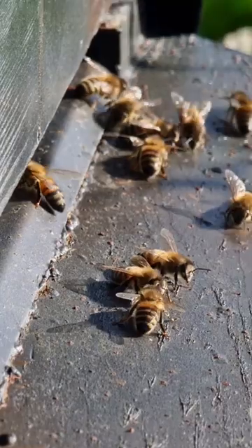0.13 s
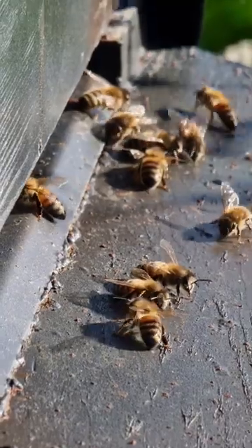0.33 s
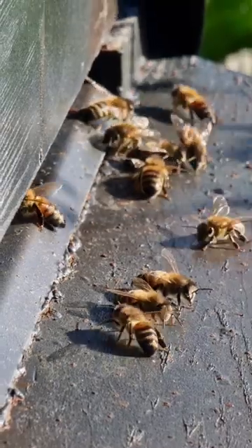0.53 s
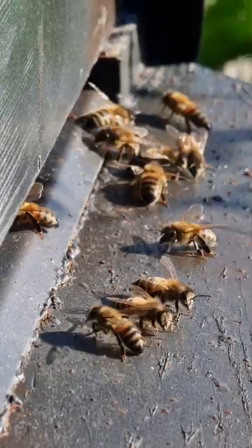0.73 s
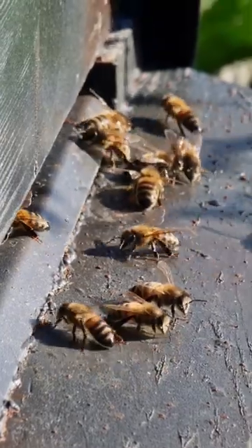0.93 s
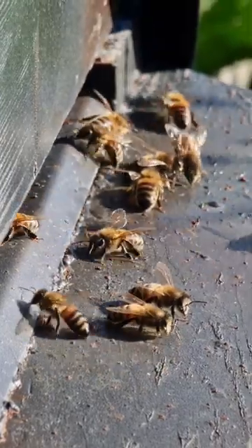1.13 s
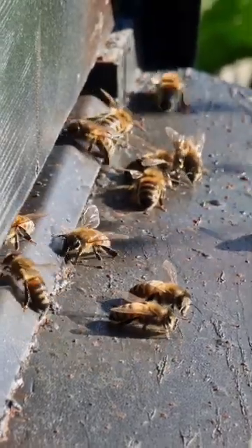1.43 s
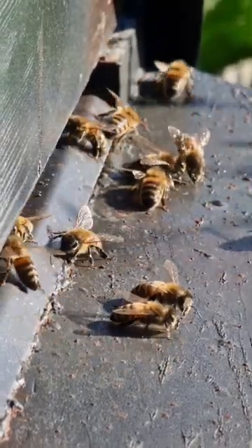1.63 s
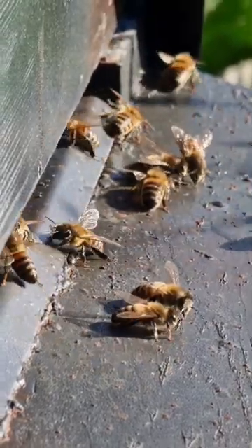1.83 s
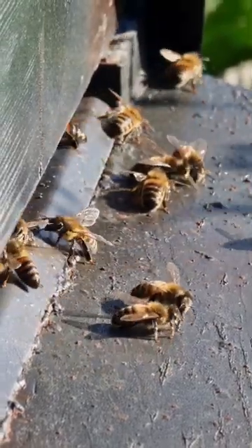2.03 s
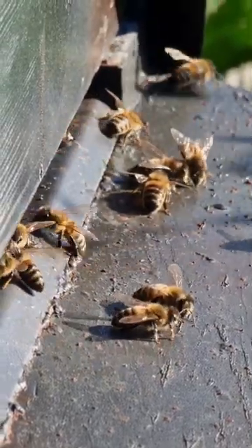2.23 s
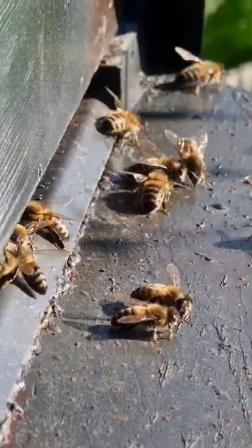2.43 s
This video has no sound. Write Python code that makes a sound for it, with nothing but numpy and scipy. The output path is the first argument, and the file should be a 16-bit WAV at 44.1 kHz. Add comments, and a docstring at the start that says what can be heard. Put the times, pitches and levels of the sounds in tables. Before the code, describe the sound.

Many bees hum in a low, wavering blend on a hive landing board outdoors, while wind rumbles and thumps on a close stereo microphone; distant road rush, soft leaf hiss and faint bird chirps lie behind.

```python
"""Bees fanning at a hive in light wind

Bees fan on the landing board of a hive outdoors: detuned harmonic sums blur into a hum of many wings.
Wind buffets two microphone ports as low noise and short low swings that rise and fade; a distant road,
as coloured noise, rumbles and rushes from the left, uneven in level but rising overall. Leaves are a
steady patchy hiss, and a far bird is a few thin gliding sines blurred by noise. The sound begins
abruptly after a short silence."""
import sys
import numpy as np
from scipy import signal
from scipy.fft import rfft, irfft
from scipy.io import wavfile
from scipy.ndimage import uniform_filter1d

SR = 44100
rng = np.random.default_rng(int(sys.argv[2]) if len(sys.argv) > 2 else 0)


def digitize_waveform(pressure):
    """Quantize a signal to 16-bit integers and store it at the path in sys.argv[1].

    Rows of a 2-D input are taken as channels; values are limited to [-1, 1].
    """
    field = np.atleast_2d(pressure).T
    bounded = np.clip(field, -1, 1)
    quanta = np.round(bounded * 32767).astype(np.int16)
    wavfile.write(sys.argv[1], SR, quanta)


N = 114219


def amp(db):
    """Decibel law: a level as an amplitude ratio."""
    return 10 ** (np.asarray(db) / 20)


def rms_one(x):
    """Normalisation of power: scale to an rms of 1."""
    return x / np.sqrt(np.mean(x ** 2) + 1e-20)


def in_time(rows):
    """Linear interpolation: the columns of a time table at every sample."""
    s, *columns = np.transpose(rows)
    return [np.interp(np.arange(N) / SR, s, column) for column in columns]


def grid_hz():
    """Discrete Fourier frequencies, kept at 1 Hz or more for the logarithm."""
    return np.maximum(np.arange(N // 2 + 1) * SR / N, 1)


def at_hz(points):
    """Log-frequency interpolation: a spectrum table on the Fourier grid."""
    hz, value = np.transpose(points)
    return np.interp(np.log(grid_hz()), np.log(hz), value)


def drift(rate_hz):
    """Low-passed random process: noise through two equal poles, as a slow wander of rms 1."""
    step = 40  # samples between computed values
    pole = np.exp(-2 * np.pi * rate_hz * step / SR)
    raw = rng.standard_normal(N // step + 2002)
    slow = signal.lfilter([1], [1, -2 * pole, pole ** 2], raw)[2000:]  # drop the settling
    return np.interp(np.arange(N) / step, np.arange(len(slow)), rms_one(slow))


def evened(x, window, floor, evenness):
    """Amplitude compression: divide by a power of the local mean square over a window of samples."""
    return x / (uniform_filter1d(x ** 2, size=window) + floor) ** (evenness / 2)


def band_noise(low_hz, high_hz, shape):
    """Band-limited white noise of rms 1."""
    band = signal.butter(3, [low_hz, high_hz], "band", fs=SR, output="sos")
    return rms_one(signal.sosfilt(band, rng.standard_normal(shape)))


def noise(colour, alike, patchy_db, rate_hz):
    """Partial coherence: noise partly shared by the ports, its octave bands flickering; rms 1."""
    shared, left, right = rfft(rng.standard_normal((3, N)))
    pair = np.sqrt(alike) * shared + np.sqrt(1 - alike) * np.array([left, right])
    pair = pair * amp(at_hz(colour))
    octave = np.log2(grid_hz())
    together = drift(rate_hz / 4)
    out = 0
    for centre in np.arange(4, 15):
        window = np.clip(1 - np.abs(octave - centre), 0, 1)
        flicker_db = patchy_db * (.5 * together + drift(rate_hz))
        out = out + irfft(pair * window, N) * amp(flicker_db)
    return rms_one(out)


def filtered(x, response):
    """Circular convolution; the mirrored end replaces the start, later silenced, to ease the wrap."""
    padded = np.concatenate([x[:, :-2001:-1], x[:, 2000:]], axis=1)
    return irfft(rfft(padded) * response, N)


# uneven level of the road, rising overall:
# start_s [s], level_db [dB, in an 800 Hz band about 1 kHz, before the trim]
ROAD_LEVEL = [(0.13, -51), (1.18, -48.5), (1.25, -54), (1.27, -45.5), (1.33, -50), (1.42, -46.5),
              (1.44, -47.5), (2.51, -45.5), (2.59, -44.5)]
# engine rumble and tyre rush: frequency_hz [Hz], density_db [relative dB per Hz]
ROAD_SPECTRUM = [(40, 7), (80, 18.5), (130, 14), (200, 7.5), (280, -3.5), (420, -7), (600, -4.5), (800, 1),
                 (1100, 1), (1400, -3.5), (1700, -11.5), (2500, -23), (4000, -50.5)]
# share of road power common to both ports: frequency_hz [Hz], shared [0-1]
ROAD_COHERENCE = [(60, 1), (150, 0.68), (260, 1), (340, 0.98), (420, 0.26), (520, 0.94), (700, 0.84),
                  (820, 0.8), (1050, 0.66), (1250, 0.63), (1600, 1), (1900, 0), (2500, 0.3)]
ROAD_TRIM_DB, ROAD_PATCHY_DB, ROAD_FLICKER_HZ = 3, 1.43, 7.1


def road():
    """Broadband radiation of far traffic: partly coherent coloured noise under an uneven level."""
    level_db, = in_time(ROAD_LEVEL)
    density_1khz = rms_one(amp(at_hz(ROAD_SPECTRUM)))[int(1000 * N / SR)]
    band_rms = density_1khz * np.sqrt(2 * 800 / SR)
    rush = noise(ROAD_SPECTRUM, at_hz(ROAD_COHERENCE), ROAD_PATCHY_DB, ROAD_FLICKER_HZ)
    return amp(level_db + ROAD_TRIM_DB) / band_rms * rush


# groups of fanning bees: nominal_beat_hz [Hz], spread [share of beat per detuning step],
# base_level_db [dB], left_minus_right_db [dB]
BEE_GROUPS = [(266.6, .015, -53.5, 1.5), (235.3, .012, -54, -3.5), (216.1, .025, -54.5, 1),
              (87.36, .02, -42, 2)]
# strength of the wing-beat harmonics, one row per group, columns harmonics 1 to 7 [relative dB]
WING_HARMONICS = [
    [-7.5, -5, 1.5, -3, -2, -8.5, -16.5],
    [-2, -11, -1.5, 2.5, 2, -6, -10.5],
    [-4.5, -13.5, -10, -3.5, 0.5, -2, -7],
    [0.5, -25.5, -27, -31, -35.5, -29, -40],
]
# drift of the last, slowest group: start_s [s], beat [share of nominal], level_change_db [dB]
SLOW_GROUP_DRIFT = [(.13, 1.0, 1), (.3, 1.03, 5.5), (.45, 1.0, 3.5), (.6, .9, 0.5), (.85, .9, 2),
                    (1.0, 1.03, 1.5), (1.15, .97, -0.5), (1.3, .98, 0.5), (1.45, .98, -2), (1.6, .95, -6.5),
                    (1.75, .98, 9), (1.9, 1.0, -6.5), (2.1, .95, -4.5), (2.3, .95, -3.5), (2.59, .92, -14)]
WING_WANDER, WING_WANDER_HZ = .01407, 5.826  # rms share of the beat rate; pace of the wander
BEE_FLUTTER_DB, BEE_FLUTTER_HZ = 6, 5.9
GROUP_EVENNESS = .7  # how far a group keeps to its level


def bees(count=5):
    """Superposition of detuned harmonic series: each bee wanders in beat rate and flutters in level."""
    steady = (0.99, 0)  # beat share, level change in dB
    moves = [steady] * (len(BEE_GROUPS) - 1) + [in_time(SLOW_GROUP_DRIFT)]
    out = 0
    for group, harmonics_db, (pace, change_db) in zip(BEE_GROUPS, WING_HARMONICS, moves):
        beat_hz, spread, level_db, pan_db = group
        hum = 0
        for detune in np.linspace(-1.5, 1.5, count):
            wander = WING_WANDER * drift(WING_WANDER_HZ)
            wing_hz = beat_hz * pace * (1 + spread * detune + wander)
            phase = 2 * np.pi * (np.cumsum(wing_hz) / SR + rng.random())
            wave = sum(amp(db) * np.sin((k + 1) * phase) for k, db in enumerate(harmonics_db))
            flutter = amp(BEE_FLUTTER_DB * drift(BEE_FLUTTER_HZ))
            hum = hum + wave * np.exp(-detune ** 2 / 2) * flutter
        hum = rms_one(evened(rms_one(hum), 5000, .1, GROUP_EVENNESS))
        out = out + hum * amp(level_db + change_db + np.array([[pan_db], [-pan_db]]) / 2)
    return out


# hiss of leaves: frequency_hz [Hz], density_db [relative dB per Hz]
LEAF_SPECTRUM = [(700, -38.5), (1500, 1), (2200, 0.5), (3200, -1), (4200, -5.5), (5200, -9), (6300, -18),
                 (7300, -30.5), (8300, -66)]
LEAVES_DB, LEAVES_LIKENESS = -55, .24  # rms level; share of power common to both ports
LEAVES_PATCHY_DB, LEAVES_FLICKER_HZ = .5, 6.7


def leaves():
    """Incoherent summation of many small sources: a nearly steady coloured hiss."""
    return amp(LEAVES_DB) * noise(LEAF_SPECTRUM, LEAVES_LIKENESS, LEAVES_PATCHY_DB, LEAVES_FLICKER_HZ)


# wind on the ports: start_s [s], level_db [dB], left_minus_right_db [dB]
WIND_GUSTS = [(.13, -36, -6.5), (.2, -37.5, -17), (.33, -39.5, -7.5), (.42, -44.5, 2), (.5, -35, -7),
              (.6, -40.5, -2.5), (.75, -35.5, -7), (.88, -37.5, -5.5), (1.0, -38.5, -0.5),
              (1.12, -35.5, -6), (1.21, -39, -6.5), (1.27, -40, -12.5), (1.4, -36.5, -9), (1.47, -44, -7.5),
              (1.56, -33, 3), (1.65, -39.5, -11), (1.8, -38, -10.5), (1.92, -38, -7.5), (2.05, -37.5, -6.5),
              (2.17, -34, 13), (2.25, -28, 0), (2.32, -35, -1.5), (2.4, -34.5, 3.5), (2.48, -39, 15),
              (2.54, -33, -10.5), (2.59, -31, -13)]
# turbulence: frequency_hz [Hz], density_db [relative dB per Hz]
WIND_SPECTRUM = [(15, -26), (22, -16), (32, -12), (42, -11), (52, 2.5), (65, 3), (80, 1), (100, -5.5),
                 (125, -15), (200, -21), (400, -44), (1000, -92)]
# bright edge: centre, level at the mean gust, dB per dB of gust
GUST_EDGE_HZ, GUST_EDGE_DB, GUST_EDGE_GROWTH = 135, -30, 1.6
LUMPY_DB, LUMPS_HZ, WIND_LIKENESS, WIND_PATCHY_DB = 2.8, 15, .34, .83
EVENNESS = .6  # how far the turbulence keeps to the gust level


def wind():
    """Turbulent pressure fluctuation: mostly separate at each port; stronger gusts are brighter."""
    level_db, pan_db = in_time(WIND_GUSTS)
    lumps_db = LUMPY_DB * np.array([drift(LUMPS_HZ), drift(LUMPS_HZ)])
    port_db = level_db + np.array([pan_db, -pan_db]) / 2 + lumps_db
    swirl = noise(WIND_SPECTRUM, WIND_LIKENESS, WIND_PATCHY_DB, LUMPS_HZ)
    swirl = rms_one(evened(swirl, 1000, .082, EVENNESS))
    mean_db = level_db.mean()
    edge_db = GUST_EDGE_DB + mean_db + GUST_EDGE_GROWTH * (port_db - mean_db)
    edge = band_noise(GUST_EDGE_HZ / 2, GUST_EDGE_HZ * 2, (2, N))
    return amp(port_db) * swirl + amp(edge_db) * edge


# bird chirps: start_s [s], length_s [s], start_pitch_hz [Hz], end_pitch_hz [Hz],
# level_db [dB, peak before rasp, blur and pan]
BIRD_CHIRPS = [(.208, .036, 4800, 5400, -62), (.435, .03, 3250, 3500, -63), (.575, .035, 5250, 5050, -65),
               (.615, .025, 3900, 3700, -60), (.636, .018, 3520, 3450, -60), (.987, .015, 4450, 5000, -65),
               (1.106, .025, 3500, 3850, -59), (1.350, .014, 4650, 5000, -63),
               (1.655, .025, 5300, 5150, -68)]
BIRD_PAN_DB = 5  # left minus right
BIRD_BLUR_S, BIRD_BLUR_DB = .03, -3  # leaves scatter the chirps
BIRD_RASP_DB, BIRD_RASP_HZ = 2, 60  # fast random waver


def bird():
    """Linear frequency modulation: short gliding whistles, then scattered by a decaying noise tail."""
    out, t = np.zeros(N), np.arange(N) / SR
    for start_s, length_s, start_hz, end_hz, level_db in BIRD_CHIRPS:
        u = np.clip((t - start_s) / length_s, 0, 1)  # progress through the chirp
        cycles = length_s * (start_hz * u + (end_hz - start_hz) * u ** 2 / 2)
        out += amp(level_db) * np.sin(np.pi * u) * np.sin(2 * np.pi * cycles)
    out = out * amp(BIRD_RASP_DB * drift(BIRD_RASP_HZ))
    tail_length = int(BIRD_BLUR_S * SR)
    tail = rng.standard_normal(tail_length) * amp(np.linspace(0, -20, tail_length))
    tail = tail / np.sqrt(np.sum(tail ** 2))
    out = out + amp(BIRD_BLUR_DB) * signal.fftconvolve(out, tail)[:N]
    return out * amp(np.array([[BIRD_PAN_DB], [-BIRD_PAN_DB]]) / 2)


# hard buffets: centre_s [s], swing_level_db [dB], swing_hz [Hz], port [0 left, 1 right]
PORT_BUFFETS = [(.247, -20, 75, 1), (.303, -21, 64, 1), (.406, -24.5, 69.8, 0), (0.447, -21, 54.8, 1),
                (.515, -27.5, 75, 1), (0.542, -15, 63.8, 0), (0.936, -22, 61.3, 1), (1.094, -26.5, 66.3, 1),
                (1.322, -19.5, 85, 1), (1.41, -24, 69, 1), (1.505, -24, 96.6, 1), (1.542, -21, 54.8, 1),
                (1.685, -25, 88, 1), (1.951, -25.5, 94, 1), (1.998, -19, 73, 1), (2.212, -11, 66, 0),
                (2.261, -18.5, 74.7, 0), (2.297, -20.5, 93, 0), (2.528, -26.5, 85.5, 1),
                (2.568, -19.5, 54.5, 1)]
BUFFET_SWINGS = .9  # half-width of the Gaussian envelope in cycles
SNAP_HZ, SNAP_DB, SNAP_S = 240, -8, .008  # pitch region; level against a 0 dB swing; lead and half-width


def buffets():
    """Transient membrane displacement: one is sucked out for a swing or two; hard ones snap first."""
    out, t = np.zeros((2, N)), np.arange(N) / SR
    snap = band_noise(SNAP_HZ / 2, SNAP_HZ * 1.37, N)
    for centre_s, level_db, swing_hz, port in PORT_BUFFETS:
        cycles = (t - centre_s) * swing_hz
        swing = -np.exp(-(cycles / BUFFET_SWINGS) ** 2) * np.cos(2 * np.pi * cycles)
        snap_envelope = np.exp(-((t - centre_s + SNAP_S) / SNAP_S) ** 2)
        onset = amp(SNAP_DB + level_db) * snap * snap_envelope  # grows faster than the swing
        out[int(port)] += amp(level_db) * (swing + onset)
    return out


# phase by which airborne sound leads at the left port: frequency_hz [Hz], lead [radians]
LEFT_PHASE_LEAD = [(60, -0.28), (330, 0.06), (430, 0.32), (650, 1.32), (900, 1), (1050, 1.32), (1250, 2),
                   (1900, 2.5), (2600, 4.5), (3700, 6.5), (5000, 8), (8000, 15.5)]


def scene():
    """Interaural-style phase difference: road, bees and leaves lag on the right; wind acts directly."""
    air = road() + bees() + leaves()
    lag = np.exp(-1j * np.outer([0, 1], at_hz(LEFT_PHASE_LEAD)))
    return filtered(air, lag) + wind() + bird() + buffets()


# unequal colour of the ports: frequency_hz [Hz], left_minus_right_db [dB]
PORT_DIFFERENCE = [(60, -0.5), (87, -1.5), (130, -3.5), (180, 3), (260, -9), (380, -0.5), (550, 0.5),
                   (790, 5.5), (1140, -2.5), (1650, 1), (2380, 2), (3440, -1), (4970, -3.5), (7180, 12.5),
                   (10400, 6), (15000, 1.5)]
# self-noise of the microphones: frequency_hz [Hz], density_db [relative dB per Hz]
MICROPHONE_NOISE = [(5000, -18), (8000, -22), (10000, 0), (12500, 3.5), (15000, 4), (16000, -0.5)]
SELF_NOISE_DB = -78  # rms before the port colour
START_S, CUTOFF_HZ = .1253, 15500


def record(dry):
    """Linear transducer with self-noise: unequal ports, an abrupt start and a steep low-pass."""
    x = dry + amp(SELF_NOISE_DB) * noise(MICROPHONE_NOISE, 0, .5, 10.0)
    x = filtered(x, amp(np.outer([.5, -.5], at_hz(PORT_DIFFERENCE))))
    x = x * (np.arange(N) >= START_S * SR)
    return signal.sosfilt(signal.ellip(16, .5, 90, CUTOFF_HZ, fs=SR, output="sos"), x)


dry = scene()
out = record(dry)
digitize_waveform(out)
```